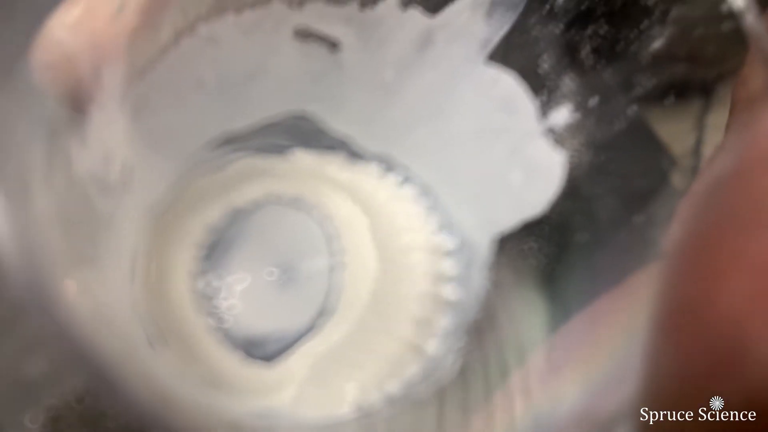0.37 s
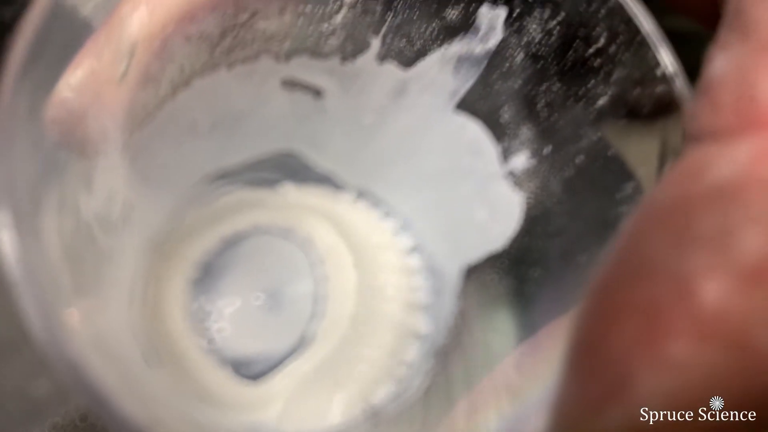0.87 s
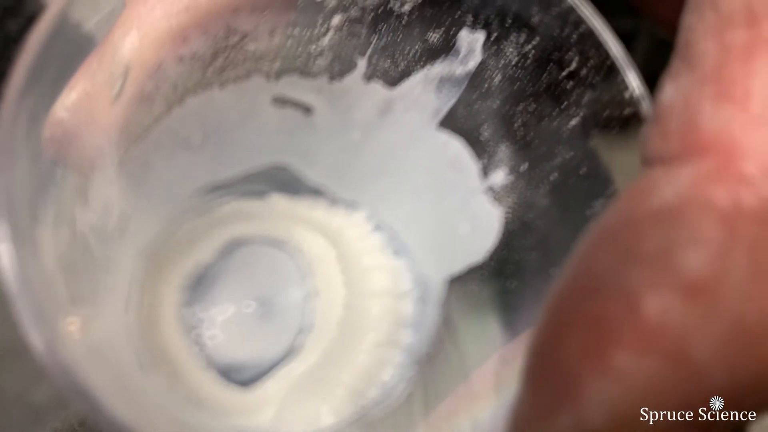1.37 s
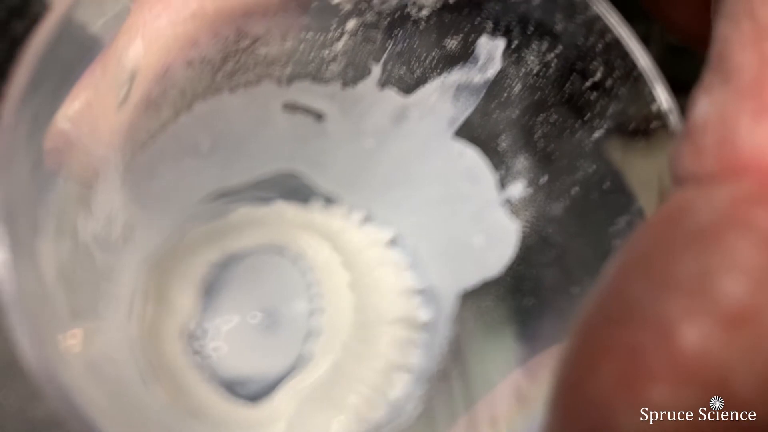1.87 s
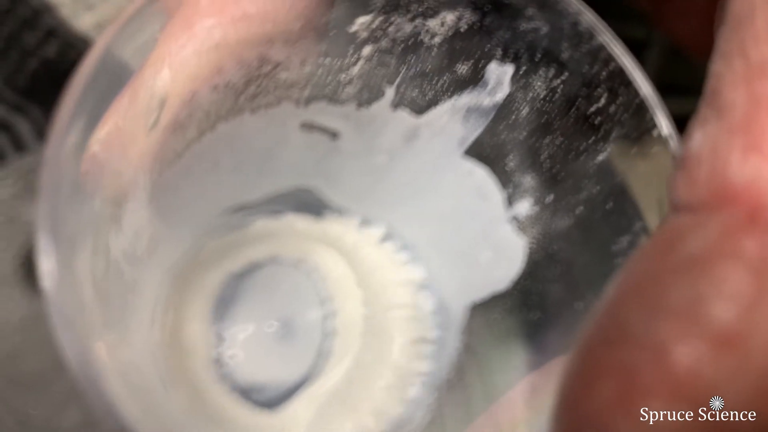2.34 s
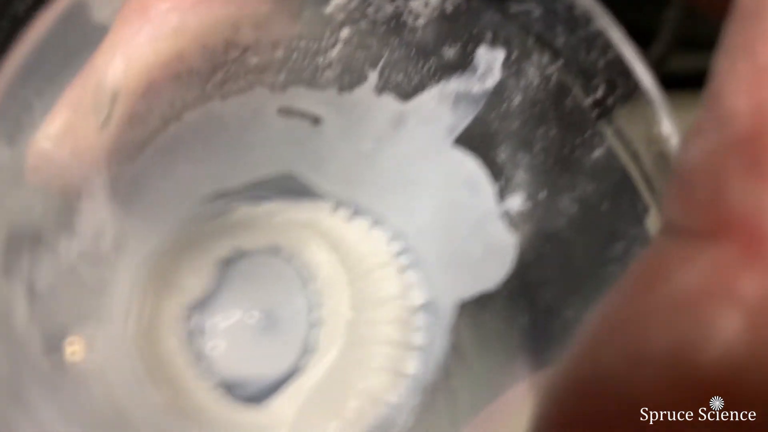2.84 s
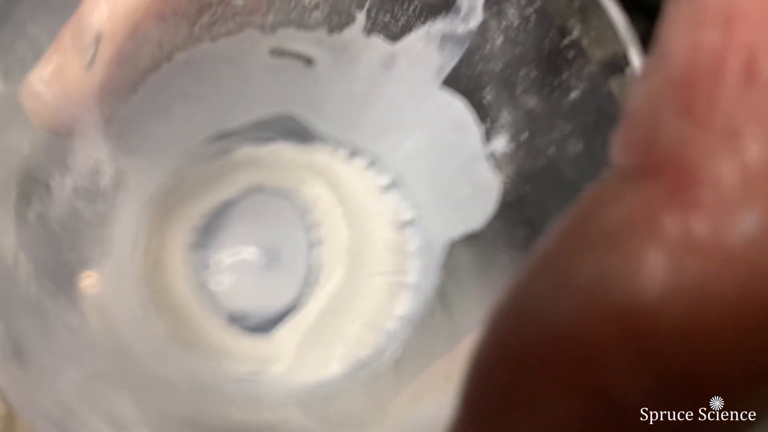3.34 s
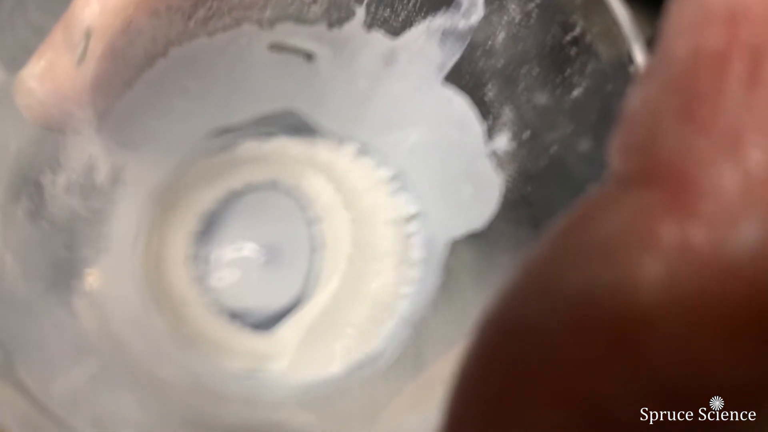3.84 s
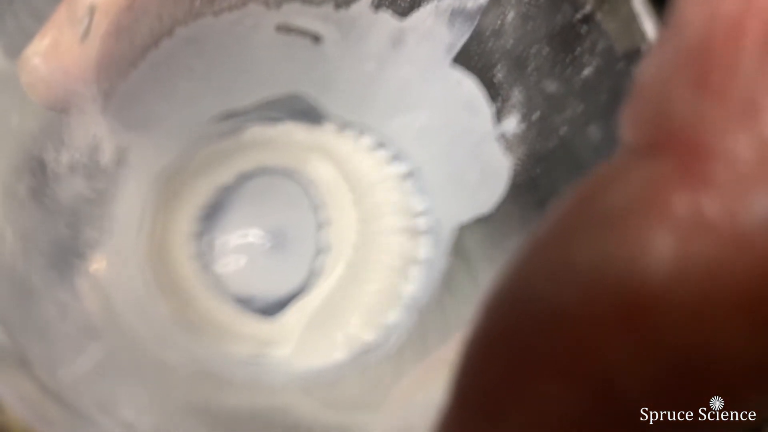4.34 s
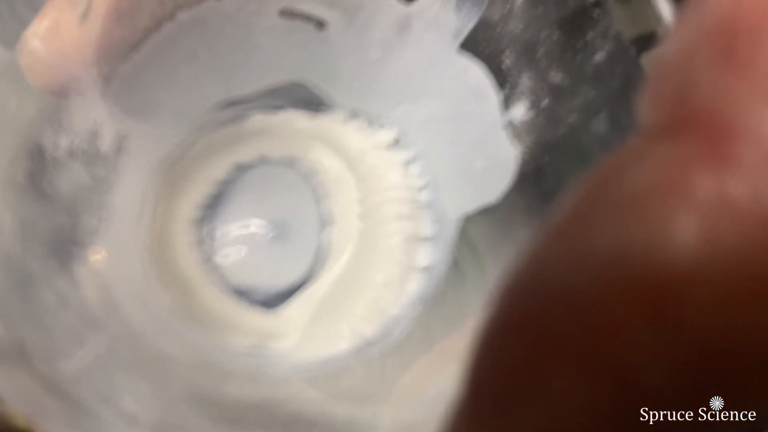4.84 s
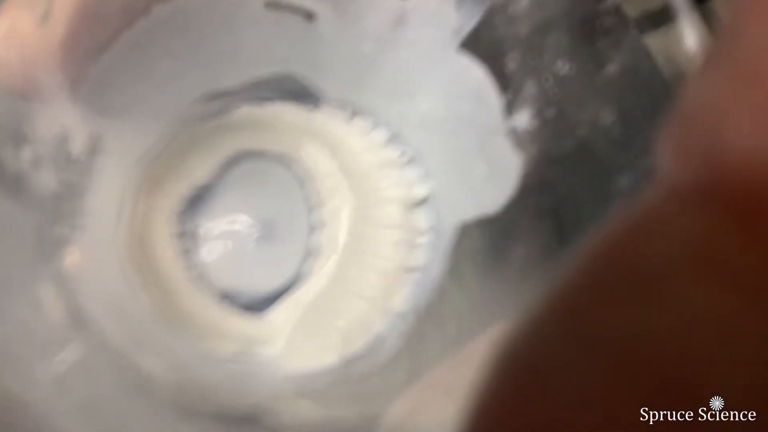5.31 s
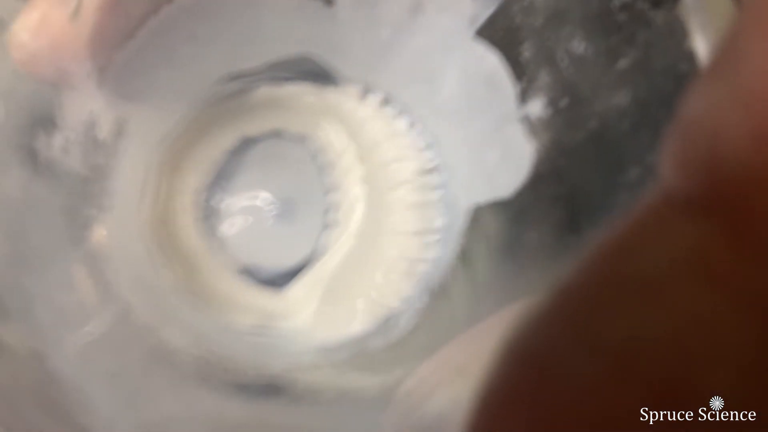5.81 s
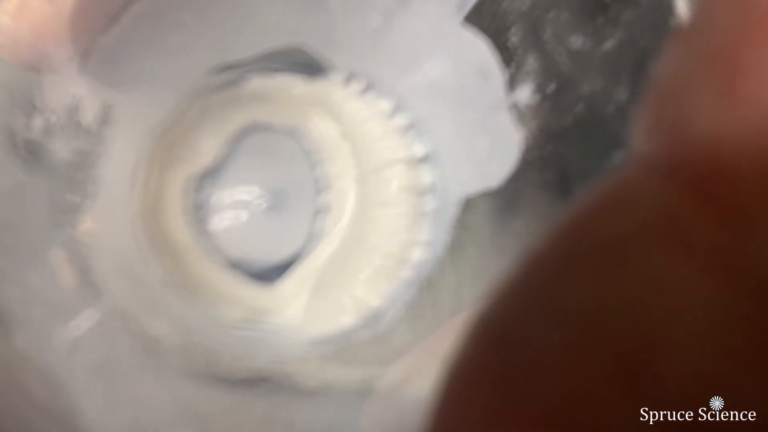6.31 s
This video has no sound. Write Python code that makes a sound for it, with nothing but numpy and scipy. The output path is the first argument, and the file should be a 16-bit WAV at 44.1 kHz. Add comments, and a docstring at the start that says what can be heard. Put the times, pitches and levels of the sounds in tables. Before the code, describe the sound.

An orbital sander runs at nearly constant speed with a plastic cup held on its pad. A low steady hum sits under a narrow high whine, a rough mid-range buzz and rushing cooling air. About halfway the grip shifts: hum, whine and air weaken, while the buzz grows slightly fuller. Close stereo microphones, no start or stop.

```python
"""A low hum and a wavering whine: an orbital sander at a nearly steady speed, a plastic cup held on its pad.
A pair of microphones stands close by. The unbalanced shaft hums once a turn and twelve rotor slots whine at
12, 24 and 36 times that; the ball bearing adds tones between the multiples. These are sines locked to the turn.
The housing buzz, cooling air and brush hiss are coloured noise; faint steady tones fill the room."""
import sys
import numpy as np
from scipy import signal
from scipy.fft import irfft, next_fast_len
from scipy.io import wavfile

SR = 44100
rng = np.random.default_rng(int(sys.argv[2]) if len(sys.argv) > 2 else 0)


def log_audio(samples):
    """Write samples as a 16-bit WAV file to the path given in sys.argv[1]."""
    # one column per channel
    frames = np.atleast_2d(samples).T
    # limit to full scale, then quantise
    limited = np.clip(frames, -1, 1)
    pcm = np.round(limited * 32767).astype(np.int16)
    wavfile.write(sys.argv[1], SR, pcm)


def boost_factor(decibels):
    """Convert a level in decibels to a linear amplitude factor."""
    exponent = np.asarray(decibels, float) / 20
    return 10 ** exponent


N = 284004

# Shaft speed: t/s, rate/(turns per s)
SHAFT_SPEED = [(0.5, 251.21), (1.3, 251.41), (1.7, 251.78), (2.5, 251.91), (2.9, 251.78), (4.5, 251.68),
               (4.9, 251.62), (6.3, 251.7)]
# How strongly the pad's shaking reaches the microphones; drops as the grip shifts near 3 s: t/s, level/dB
PAD_REACH = [(0.2, 5.2), (0.9, 2.9), (1.4, 2.1), (1.8, 2.6), (2.9, 1.0), (3.21, -2.3), (4.5, -3.4),
             (5.11, -3.7), (5.31, -2.3), (5.75, -2.3), (6.35, -4.2)]
# How hard the cup is pressed on the pad: t/s, level/dB
CUP_PRESSURE = [(0.1, 0), (0.45, -3), (1.4, -4), (1.9, -2), (2.3, -3.6), (2.8, -3), (3.1, 2), (3.35, 0.5),
                (3.7, 2), (4.7, 2), (5.7, 5.5), (6.35, 6.5)]
# Narrow slot whine, swinging as the hand turns the tool:
# t/s, x12 level/dB, x24 level/dB, x12 left against right level/dB, x12 left lead/rad
SLOT_WHINE = [(0.15, -46.8, -51.6, -3.6, 2.09), (0.35, -46, -49.5, -4.8, 2.04),
              (0.55, -46, -43.5, -6.4, 1.97), (0.75, -46, -43.8, -7.0, 1.97),
              (0.95, -46.1, -46.2, -7.3, 2.0), (1.5, -46.4, -48.2, -7.8, 2.02),
              (2.3, -45.1, -48.8, -8.0, 1.35), (2.93, -46.2, -49, -6.4, 1.25),
              (3.2, -52.2, -55.7, -7.3, 1.9), (3.5, -52.3, -60.5, -7.0, 2.7),
              (3.9, -56.2, -57.5, -2.0, 3.16), (4.15, -55.9, -60.2, -0.8, 3.3),
              (4.6, -54.2, -56, -7.4, 2.54), (5.0, -53.3, -54, -11.9, 2.17), (5.3, -50.5, -51.5, -9.5, 2.2),
              (5.55, -53.2, -51.5, -7.6, 2.5), (6.3, -55.6, -54.5, -1.0, 3.3)]
# Fainter multiples of the turn: multiple of the shaft rate, rms level/dB
SHAFT_MULTIPLES = [(3, -69), (4, -65), (5, -60.5), (8, -73.5), (11, -72), (13, -70.5), (14, -75), (15, -77),
                   (16, -68), (17, -72), (18, -73), (19, -72), (21, -74), (22, -78), (23, -79), (25, -78),
                   (26, -90), (28, -85), (29, -81), (30, -82), (35, -75), (37, -78), (38, -78), (41, -78),
                   (42, -84), (43, -81), (44, -83), (48, -72), (52, -82), (53, -83), (56, -80)]
# Ball bearing, between the multiples: multiple of the shaft rate, rms level/dB
BALL_TONES = [(1.172, -86), (1.397, -91), (2.594, -75), (3.409, -83), (3.594, -72), (3.816, -75),
              (4.819, -57), (5.216, -65), (5.284, -67), (5.422, -67), (5.819, -69), (6.025, -69),
              (7.091, -73), (7.303, -73), (7.9, -71), (8.094, -71), (8.509, -70), (8.638, -70),
              (8.697, -62), (9.3, -70), (9.516, -72), (9.638, -73), (9.713, -66), (9.841, -71),
              (9.903, -66), (10.506, -67), (10.638, -73), (11.522, -71), (11.706, -72), (11.841, -76),
              (12.475, -73), (12.634, -75), (3.55, -76)]
# Faint low noise around the hum, partly following its level: f/Hz, level per Hz/dB
LOW_NOISE = [(20, -113), (60, -111), (120, -101.5), (200, -100.5), (300, -99.5), (340, -103), (375, -114),
             (415, -110), (430, -104)]
# Lumpy lows that come and go: f/Hz, level per Hz/dB
LOW_LUMPS = [(20, -112), (45, -106), (70, -105), (110, -114)]
# Housing buzz before its offset: f/Hz, level per Hz/dB
BUZZ_MIDDLE = [(430, -103.1), (520, -91.5), (650, -86), (800, -91.5), (1000, -90), (1150, -83.5),
               (1300, -78), (1550, -82), (1700, -85.5), (2000, -82.5), (2300, -84.5), (2450, -81.5),
               (2800, -87.5), (3200, -84.5)]
# Treble of the housing buzz: f/Hz, level per Hz/dB
BUZZ_TREBLE = [(3200, -85), (3700, -89.4), (4100, -84), (4600, -91.5), (6300, -92.5), (7200, -93.5),
               (8600, -94.5)]
# Housing resonances and dips: f/Hz, width/Hz, level/dB
HOUSING_PANELS = [(2200, 72, 4.5), (2640, 70, 3.5), (1490, 100, 1), (4280, 84, 0.5), (2310, 70, -4),
                  (2820, 120, -2)]
# Shape of the air rush: f/Hz, relative level per Hz/dB
AIR_SHAPE = [(4000, -33), (4500, -8), (5600, -3), (6150, -2), (6450, -2), (6750, -9), (7300, -26)]
# Shape of the brighter air at the start: f/Hz, relative level per Hz/dB
BRIGHT_SHAPE = [(6150, -12), (6350, -2), (6550, 0), (6800, -8), (7300, -14)]
# Brush hiss before its offset: f/Hz, level per Hz/dB
BRUSH_HISS = [(8600, -95.3), (9500, -92.2), (10500, -94.3), (12000, -96.6), (14100, -97.2), (14600, -101.5),
              (15100, -106), (15720, -111)]
# Steady tones in the room: f/Hz, rms level/dB
ROOM_HUM = [(60, -92.5), (120, -86), (352, -92)]
# Left microphone against right: f/Hz, level/dB, lead/rad, likeness/(0-1)
MICROPHONE_PAIR = [(60, -1, 0, .62), (252, -.5, -0.9, 0.4), (540, -3.5, -.45, 0.95), (720, 0, -.25, .86),
                   (850, 1.5, -.55, .76), (1010, -2.5, -1.05, .77), (1230, -3, -.62, .96),
                   (1500, -1.1, -.21, .9), (1700, -2.5, -.5, .7), (1820, -7.2, 1.1, 0.46),
                   (2230, -6.1, 2, .76), (2490, -7.2, 1.3, .66), (2680, -1.1, 1.05, .76),
                   (3270, -1.1, 1.68, .71), (4090, 0, 2, .91), (4750, 0, 3.14, .965), (9000, 0, 3.14, .96)]

TREBLE_LAG_S, LAG_FROM_HZ = .000237, 4750   # extra lag of the right microphone above this pitch
HUM_DB, SECOND_DB, AIR_DB = -47.5, -68, -58.3   # levels at reach and pressure 0 dB
WHINE_36_DB, WHINE_36_RISE_DB, WHINE_36_FULL_S = -66, 6.5, 1.35   # comes up at first, then holds
AIR_FOLLOWS, LOW_NOISE_FOLLOWS = 1.2, .4   # share of the reach's swing
BUZZ_DB, HISS_DB = -0.8, -0.3   # offsets at pressure 0 dB
BUZZ_FOLLOWS, HISS_FOLLOWS = .22, .08   # share of the pressure's swing
BRIGHT_DB, BRIGHT_FADE_DB_PER_S = -57, 16   # level at the start, and its fall


def rms_one(x):
    """Scale to rms 1."""
    return x / np.sqrt(np.mean(x ** 2) + 1e-20)


def in_time(rows):
    """Columns of a time table, in straight lines, at every 40th sample."""
    s, *columns = np.transpose(rows)
    slow_s = np.arange(N // 40 + 2) * 40 / SR
    return [np.interp(slow_s, s, column) for column in columns]


def slow_drift(rate):
    """Slow chance of spread 1 at every 40th sample, changing about rate times a second."""
    pole = np.exp(-80 * np.pi * rate / SR)
    chance = rng.standard_normal(N // 40 + 2002)
    drift = signal.lfilter([1], [1, -2 * pole, pole * pole], chance)
    return rms_one(drift[2000:])   # the filter has settled by then


def fill_in(slow, cycle=np.inf):
    """Straight lines between every 40th sample; a phase is wrapped to its cycle."""
    step = np.arange(40, dtype=np.float32) / 40
    start = (slow[:-1] % cycle).astype(np.float32)
    rise = np.diff(slow).astype(np.float32)
    return (start[:, None] + rise[:, None] * step).ravel()[:N]


def gain_of(db):
    """A slow level in dB as a gain at every sample."""
    return fill_in(10 ** (db / 20))


def pair_at(hz):
    """Gain with phase of the left microphone against the right, and the likeness of the two."""
    at, level_db, lead, alike = np.transpose(MICROPHONE_PAIR)
    lag = 2 * np.pi * TREBLE_LAG_S * np.maximum(hz - LAG_FROM_HZ, 0)
    lead = np.interp(hz, at, lead) + lag
    gain = boost_factor(np.interp(hz, at, level_db))
    return gain * np.exp(1j * lead), np.clip(np.interp(hz, at, alike), 0, 1)


def stereo_noise(spectrum, peaks=()):
    """Coloured noise at both microphones, the right one following the spectrum, nothing outside it."""
    size = next_fast_len(N, real=True)
    hz = np.arange(size // 2 + 1) * SR / size + 1e-3   # keeps the logarithm finite
    at, at_db = np.transpose(spectrum)
    level_db = np.interp(np.log(hz), np.log(at), at_db, left=-200, right=-200)
    for centre_hz, width_hz, top_db in peaks:
        level_db = level_db + top_db / (1 + (2 * (hz - centre_hz) / width_hz) ** 2)
    real, imaginary = rng.standard_normal((2, 2, len(hz)))   # white noise, drawn as a spectrum
    shared, own = (real + 1j * imaginary) * boost_factor(level_db) * np.sqrt(size * SR) / 2
    left_gain, alike = pair_at(hz)
    left = left_gain * (alike * shared + np.sqrt(1 - alike ** 2) * own)
    return irfft([left, shared], size)[:, :N]


def tone(turns, multiple, level_db, waver_db, slip, side=None):
    """A sine locked to the shaft whose level and phase (slip/rad) waver; side = its own left dB and lead."""
    phase = 2 * np.pi * (multiple * turns + rng.random()) + slip * slow_drift(6.0)
    level_db = level_db + waver_db * slow_drift(9.0)
    pair_gain = pair_at(multiple * SHAFT_SPEED[0][1])[0]
    left_db, lead = side or (20 * np.log10(abs(pair_gain)), np.angle(pair_gain))
    left = gain_of(level_db + left_db) * np.cos(fill_in(phase + lead, 2 * np.pi))
    right = gain_of(level_db) * np.cos(fill_in(phase, 2 * np.pi))
    return np.sqrt(2) * np.array([left, right])   # rms to peak


def motor(turns, reach_db, press_db):
    """Unbalance hum and rotor slot whine; pressing the cup down brings out the second multiple."""
    slot_db, slot2_db, *side = in_time(SLOT_WHINE)
    slot3_db, = in_time([(0, WHINE_36_DB - WHINE_36_RISE_DB), (WHINE_36_FULL_S, WHINE_36_DB)])
    hum = tone(turns, 1, HUM_DB + reach_db, waver_db=0.1, slip=.01)
    hum += tone(turns, 2, SECOND_DB + press_db, waver_db=1.1, slip=0.11)
    whine = tone(turns, 12, slot_db, waver_db=.6, slip=.1, side=side)
    whine += tone(turns, 24, slot2_db, waver_db=.6, slip=.15)
    whine += tone(turns, 36, slot3_db, waver_db=1.6, slip=.2)
    return hum + whine


def shaft_and_bearing(turns):
    """Fainter multiples of the turn; the balls slip, so their tones are less steady."""
    shaft = sum(tone(turns, round(k), db, waver_db=1.0, slip=.12) for k, db in SHAFT_MULTIPLES)
    bearing = sum(tone(turns, k, db, waver_db=2.0, slip=.45) for k, db in BALL_TONES)
    return shaft + bearing


def housing(swell, reach_db, press_db):
    """Broad buzz swelling once a turn, its middle growing with pressure, over faint low noise and lumpy lows."""
    low_noise_db = LOW_NOISE_FOLLOWS * reach_db + 1.7 * slow_drift(3.5)
    low_noise = stereo_noise(LOW_NOISE) * gain_of(low_noise_db)
    middle_db = BUZZ_DB + BUZZ_FOLLOWS * press_db + 0.77 * slow_drift(12.0)
    middle = stereo_noise(BUZZ_MIDDLE, HOUSING_PANELS) * gain_of(middle_db)
    treble = stereo_noise(BUZZ_TREBLE, HOUSING_PANELS) * gain_of(0.57 * slow_drift(5.7))
    lumps = stereo_noise(LOW_LUMPS) * gain_of(5.0 * slow_drift(4.0))
    return low_noise + lumps + swell * (middle + treble)


def cooling_air(reach_db):
    """A rush of air around 6 kHz, following the reach; a brighter band near 6.5 kHz fades from the start."""
    rush_db = AIR_DB + AIR_FOLLOWS * reach_db + .6 * slow_drift(6.9)
    rush = gain_of(rush_db) * rms_one(stereo_noise(AIR_SHAPE))
    bright_db = BRIGHT_DB - BRIGHT_FADE_DB_PER_S * np.arange(N) / SR
    bright = boost_factor(bright_db) * rms_one(stereo_noise(BRIGHT_SHAPE))
    return rush + bright


def brushes(swell, press_db):
    """Hiss of the brushes, swelling once a turn and rising slightly with pressure."""
    hiss_db = HISS_DB + HISS_FOLLOWS * press_db + .5 * slow_drift(4.0)
    return swell * stereo_noise(BRUSH_HISS) * gain_of(hiss_db)


def room_tones():
    """Faint mains hum and a steady tone: unwavering sines, the same at both microphones."""
    t = np.arange(N) / SR
    return sum(np.sqrt(2) * boost_factor(db) * np.sin(2 * np.pi * hz * t) for hz, db in ROOM_HUM)


def scene():
    """All sources at the two microphones."""
    turns = np.cumsum(in_time(SHAFT_SPEED)[0]) * 40 / SR
    # the unbalance loads the motor once a turn
    swell = 1 + .09 * np.cos(fill_in(2 * np.pi * turns, 2 * np.pi))
    (reach_db,), (press_db,) = in_time(PAD_REACH), in_time(CUP_PRESSURE)
    tones = motor(turns, reach_db, press_db) + shaft_and_bearing(turns) + room_tones()
    noises = housing(swell, reach_db, press_db) + cooling_air(reach_db) + brushes(swell, press_db)
    return tones + noises


def top_cut(x):
    """Nothing passes above the cut-off."""
    return signal.sosfilt(signal.butter(12, 15730, fs=SR, output="sos"), x)


def record(dry):
    """The finished mix from the two microphones, with no further sound added."""
    return top_cut(dry)


dry = scene()
out = record(dry)
log_audio(out)
```